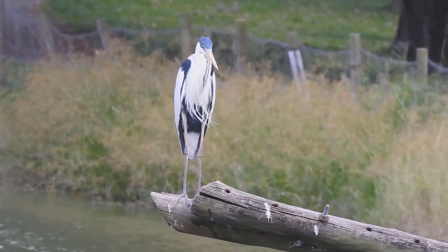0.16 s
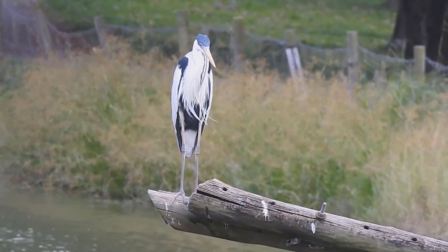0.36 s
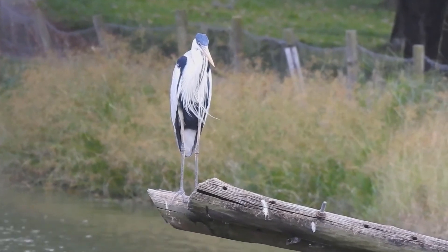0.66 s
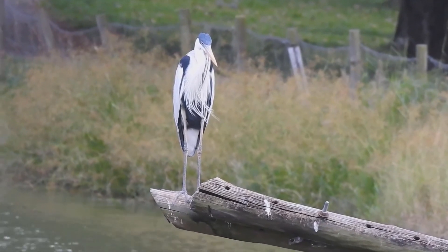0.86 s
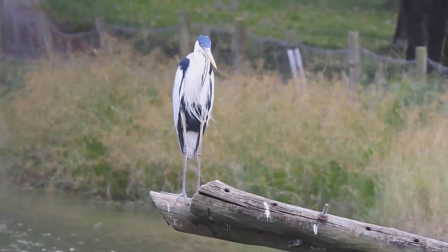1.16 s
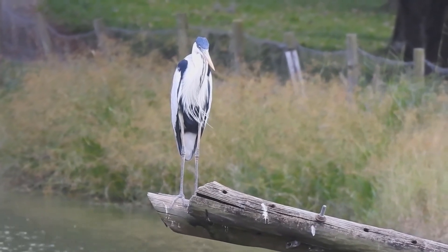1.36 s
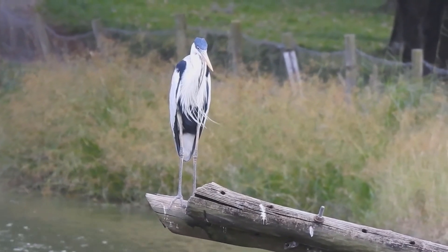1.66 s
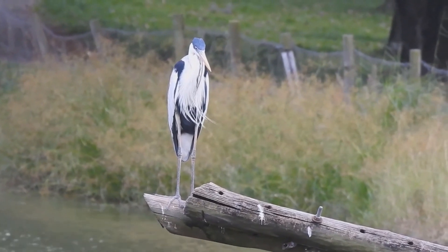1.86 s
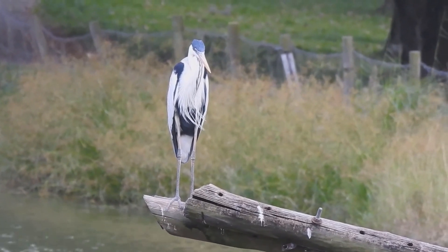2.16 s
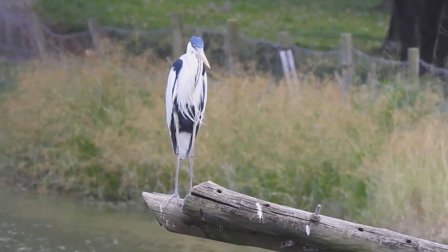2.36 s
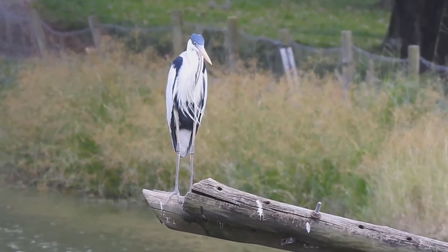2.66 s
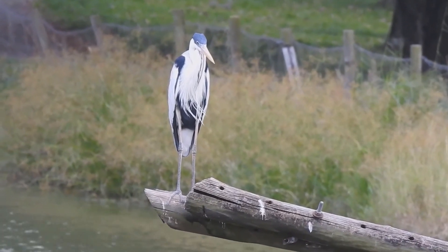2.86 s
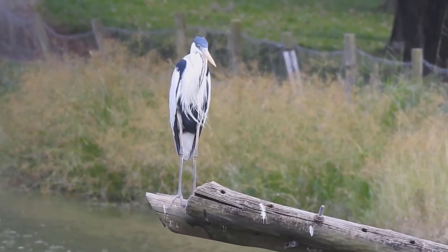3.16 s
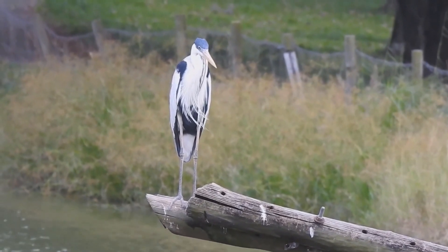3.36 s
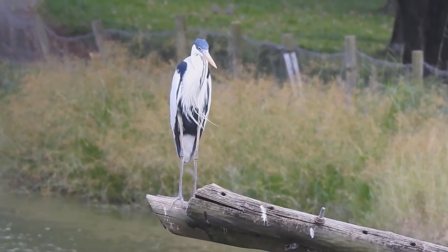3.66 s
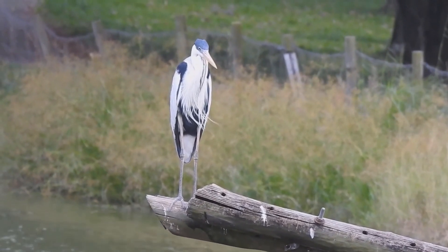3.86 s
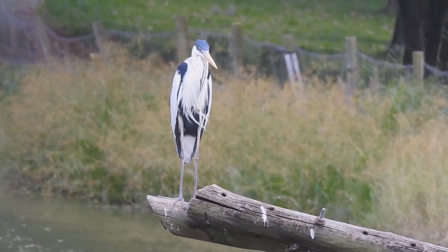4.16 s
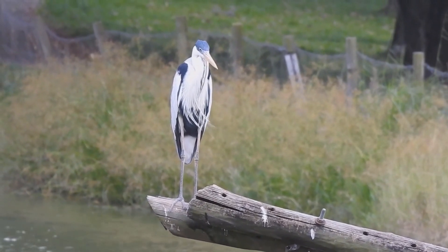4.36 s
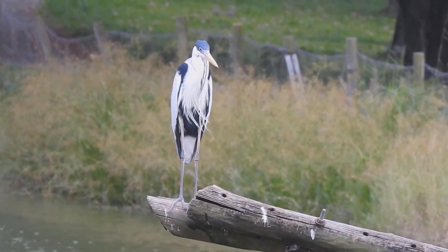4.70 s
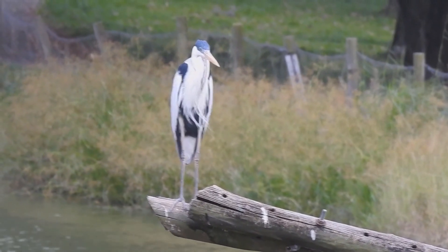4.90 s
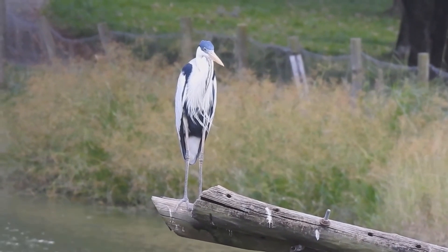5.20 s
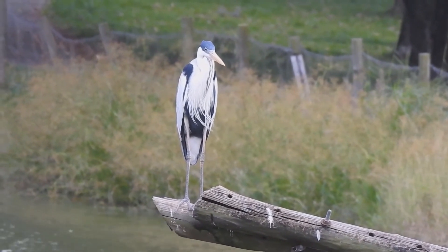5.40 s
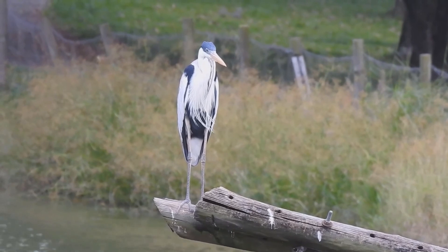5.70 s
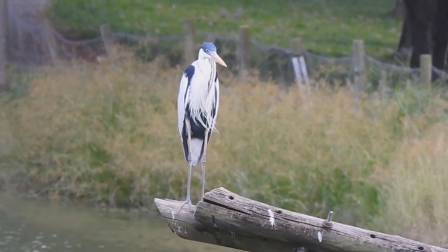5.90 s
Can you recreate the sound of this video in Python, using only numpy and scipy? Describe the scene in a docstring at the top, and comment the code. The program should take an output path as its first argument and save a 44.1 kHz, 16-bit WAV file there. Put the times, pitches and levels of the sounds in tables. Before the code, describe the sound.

A dense, steady high insect drone over a breezy pond, with quick bird whistles and chirps, low wind buffeting the microphone and a faint distant rumble.

```python
"""A pond on a breezy day: a dense chorus of insects drones in one high band, shaped from noise by one broad resonance.
Small birds whistle and squeak in the trees as bending sine notes, with a scattered tail of decaying noise.
Wind buffets each microphone port on its own: resonant low noise that swells with the gusts.
A far-off roar of noise in bands that flicker quickly and slowly, and a faint motor hum of four sine lines, lie under it."""
import sys
import numpy as np
from scipy import signal
from scipy.fft import rfft, irfft, next_fast_len
from scipy.io import wavfile
from scipy.ndimage import uniform_filter1d

SR = 44100
rng = np.random.default_rng(int(sys.argv[2]) if len(sys.argv) > 2 else 0)


def materialize(psi):
    """Save the field psi as 16-bit PCM at rate SR to the path in sys.argv[1].

    A 1-D psi becomes a single channel; in a 2-D psi each row is a channel.
    """
    bounded = np.clip(np.atleast_2d(psi).T, -1, 1)
    quanta = np.round(bounded * 32767).astype(np.int16)
    wavfile.write(sys.argv[1], SR, quanta)


N = 266342  # length in samples
TIME = np.arange(N) / SR
SIDES = np.array([[1], [-1]])  # signs for left and right
PORT_LAG = 2  # samples by which the left port lags

# insects: levels before wavering and panning; throb rate of the nearer singer
CHORUS_DB, SINGER_DB, SINGER_HZ = -38, -43.5, 68.8
# birds: left against right; energy of the trees' tail, and decay time of the tail
BIRD_PAN_DB, TREES_DB, TREES_T60_S = -2.5, -5, .4
SMEAR_HZ = 380  # rate of the random flutter that blurs the pitch of the echo
RASP_DB, RASP_HZ = -10, 800  # air noise around each near note: level under the tone, spread
PEEP_S, PEEP_SCOOP = 0.032, 0.015  # length; how far below pitch it starts, as a share
ARCH_START, ARCH_END = 0.9, 0.92  # shares of the arch's middle pitch
FAR_LOW_HZ, FAR_HIGH_HZ = 2150, 5600  # range of the faint chirps before they bend
FAR_DB = -66.5  # the faintest chirp
# wind: centre and width of each single resonance; slopes of a gust
THUD_HZ, THUD_WIDTH_HZ = 79, 90
FLUTTER_HZ, FLUTTER_WIDTH_HZ = 142, 112
RISE_DB_PER_S, FALL_DB_PER_S = 151, 132
ROAR_DB = -30
TOP_HZ = 15300  # upper limit of the microphone


def undb(db):
    """Decibels to an amplitude factor."""
    return 10 ** (np.asarray(db) / 20)


def level(x, db):
    """Scale a sound to a given RMS level."""
    return x * undb(db) / np.sqrt(np.mean(x ** 2))


def walk(rate):
    """Random levels held 1 / rate s and slewed twice; spread near 1."""
    hold = int(SR / rate)
    steps = np.repeat(rng.standard_normal(N // hold + 1), hold)
    slewed = uniform_filter1d(uniform_filter1d(steps, hold), hold)
    return 1.117 * slewed[:N]


def blend(mid, side, alike):
    """Mix a shared and an opposed part into left and right of a given likeness (-1 to 1)."""
    return np.sqrt(1 + alike) * mid + np.sqrt(1 - alike) * side * SIDES


def pair(alike):
    """Left and right noise of a given likeness."""
    mid, side = rng.standard_normal((2, N))
    return blend(mid, side, alike)


def along(table, hz):
    """Read a curve drawn over log frequency."""
    points_hz, values = np.transpose(table)
    return np.interp(np.log(hz), np.log(points_hz), values)


def bins_hz(size):
    """Frequencies of a spectrum, kept above zero for the logarithm."""
    return np.maximum(np.arange(size // 2 + 1) * SR / size, 1)


def insects():
    """Countless clicks all round blur into a drone; one nearer singer on the right throbs at its muscle rate."""
    left, right = pair(.3)
    crowd = level(organ(np.array([np.roll(left, PORT_LAG), right])), CHORUS_DB)
    shared_db = .5 * walk(1.56)
    own_db = 0.21 * np.array([walk(25.5), walk(24.8)])
    crowd = crowd * undb(shared_db + own_db - 0.51 * SIDES)  # a little stronger on the right
    cycle = np.cumsum(SINGER_HZ * (1 + 0.01 * walk(3.7))) / SR % 1
    bursts = rng.standard_normal(N) * np.exp(-cycle / .5)  # each cycle strikes and decays
    singer = level(organ(bursts), SINGER_DB) * undb(2.0 * walk(1.0))
    return crowd + singer * undb([[-7], [0]])


def organ(x):
    """The broad resonance of the sound organ, falling away on both sides."""
    # resonance of the sound organ: (f/Hz, relative level per Hz/dB)
    resonance = [(5200, -13), (6000, 3.5), (6550, 7), (6850, 1.5), (7300, -10.5), (9000, -29)]
    size = next_fast_len(N)
    hz = bins_hz(size)
    octaves_outside = abs(np.log2(np.clip(hz, resonance[0][0], resonance[-1][0]) / hz))
    gain_db = along(resonance, hz) - 16.5 * octaves_outside
    return irfft(rfft(x, size) * undb(gain_db), size)[..., :N]


def birds():
    """Direct song, a little from the right, and its scatter from trunks and leaves."""
    song = near_birds()
    rasp_filter = signal.butter(2, RASP_HZ, fs=SR, output="sos")
    air = level(signal.sosfilt(rasp_filter, rng.standard_normal(len(song))), RASP_DB)
    song = (song * (1 + air) + far_birds(len(song), count=900))[:N]
    # unsteady throats and moving air roughen each note
    song = song * undb(1.5 * walk(90) + 2.5 * walk(300))
    direct = np.array([np.roll(song, PORT_LAG), song]) * undb(SIDES * BIRD_PAN_DB / 2)
    return direct + trees(song)


def trees(song):
    """Scatter builds up and dies away as noise; fast random flutter blurs the pitch of the echo."""
    t = TIME[:SR // 2]
    decay = np.exp(-np.log(1000) * t / TREES_T60_S)
    tail = rng.standard_normal((2, len(t))) * decay * (1 - np.exp(-t / 0.025))
    tail *= undb(TREES_DB) / np.sqrt(np.sum(tail ** 2, axis=1, keepdims=True))
    blurred = song * level(walk(SMEAR_HZ), 0)
    return signal.fftconvolve(blurred[None], tail)[:, :N]


def near_birds():
    """Whistles with a weak octave, pure warbles and overtone-rich squeaks on one track."""
    # long warbles, each a pitch curve: (t/s, f/Hz)
    warbles = [
        [(.73, 5190), (.79, 6070), (.85, 6430), (.92, 6320)],
        [(2.43, 4200), (2.465, 5200), (2.48, 5500), (2.5, 4750), (2.53, 4440)],
        [(2.665, 5550), (2.685, 5250), (2.71, 4800), (2.735, 4730)],
        [(2.93, 5500), (2.955, 4160), (2.98, 3830), (3.01, 4050), (3.04, 4990), (3.075, 4730), (3.11, 3950)],
        [(3.075, 4850), (3.1, 5360), (3.12, 5050), (3.135, 4260)],
        [(4.12, 4350), (4.15, 4880), (4.175, 4340), (4.2, 3780)],
    ]
    # one value per warble: (level/dB)
    warble_levels = [-40, -47, -51, -48, -45, -50]
    # nasal squeaks: (t/s, length/s, start f/Hz, middle f/Hz, end f/Hz, level/dB, second partial trim/dB)
    squeaks = [(1.344, 0.071, 1410, 1505, 1435, -49, -20), (1.57, .15, 1383, 1522, 1705, -50, -7.5)]
    # squeak overtones from the fundamental up, before the trim: (level/dB)
    squeak_partials = [-7, 14, 4, 7.5, -7]
    song = np.zeros(N + SR)
    for s, length, hz, db in whistles():
        add(song, s, length, hz, db, [0, -24], edge=.25)
    for curve, db in zip(warbles, warble_levels):
        s, hz = np.transpose(curve)
        length = s[-1] - s[0]
        add(song, s[0], length, hz, db, [0], edge=.1, at=(s - s[0]) / length)
    for s, length, *hz, db, second_db in squeaks:
        partials_db = np.add(squeak_partials, [0, second_db, 0, 0, 0])
        add(song, s, length, hz, db, partials_db, edge=.15)
    return song


def whistles():
    """Whistled notes as (s, length s, pitches Hz, level dB), each kind by its own rule."""
    # steps of a climbing phrase:
    # (t after its start/s, length/s, start f/Hz, middle f/Hz, end f/Hz, level above the phrase/dB)
    climb_steps = [(0, 0.0216, 2890, 3010, 3770, -4), (0.016, 0.0335, 3980, 3960, 4200, 1),
                   (0.027, 0.026, 2260, 2334, 2330, -5), (0.043, 0.015, 4130, 4450, 4840, -2),
                   (0.049, 0.036, 4930, 5000, 5000, 3.5), (0.065, 0.0202, 5530, 5860, 6100, 6),
                   (0.085, 0.044, 6550, 6520, 6500, 0)]
    # each time the phrase is sung: (t/s, steps begun within/s, level/dB)
    climbs = [(1.698, .047, -45), (1.935, .1, -37), (2.08, .058, -38), (2.198, .024, -39.5)]
    # short peeps, level after a small scoop: (t/s, f/Hz, level/dB)
    peeps = [(1.17, 2280, -54), (1.199, 4470, -45), (1.277, 4800, -49), (1.302, 5340, -56),
             (1.555, 3740, -46), (1.742, 4740, -35), (1.775, 4760, -38), (1.857, 5490, -31.5),
             (1.888, 5500, -40), (1.884, 4720, -39.5), (2.02, 4950, -39), (2.025, 5650, -42),
             (2.16, 4970, -41.5), (2.185, 4990, -38), (2.505, 5040, -50), (2.455, 3020, -48),
             (2.485, 3800, -51), (2.513, 3050, -47), (2.575, 3060, -55), (2.583, 5050, -52),
             (2.658, 4940, -51), (2.63, 3030, -66), (2.685, 3000, -55), (2.711, 3000, -60),
             (2.759, 3060, -51), (2.787, 2980, -56), (2.83, 3040, -58), (2.89, 3030, -49.5),
             (2.92, 4990, -50), (2.93, 3020, -55), (3.025, 5050, -52), (3.121, 3160, -49),
             (3.18, 3190, -64), (3.283, 3060, -56), (3.305, 2950, -50), (3.325, 3180, -55),
             (3.419, 3130, -50.5), (3.496, 4630, -45), (3.525, 2400, -55), (3.529, 3140, -53),
             (3.568, 4270, -50), (3.625, 2420, -58), (4.13, 3050, -49), (4.415, 3050, -49),
             (4.82, 3050, -50.5), (3.564, 5900, -40.5), (3.566, 5500, -42), (5.03, 2320, -50.5),
             (5.585, 5300, -46), (5.62, 5230, -53)]
    # arched chirps: (t/s, length/s, middle f/Hz, level/dB)
    arches = [(3.158, 0.034, 5280, -45), (3.365, 0.031, 5140, -47), (5.398, 0.058, 8030, -52)]
    # straight slides: (t/s, length/s, start f/Hz, end f/Hz, level/dB)
    slides = [(1.824, 0.015, 3800, 3600, -46), (1.7, 0.032, 4650, 4930, -36), (2.1, 0.019, 8700, 7600, -54),
              (2.272, .02, 9000, 8500, -57), (1.3, 0.044, 4000, 4520, -55.5), (2.39, 0.02, 4200, 4050, -46),
              (2.74, .042, 5300, 5100, -44), (2.825, 0.041, 4880, 4200, -46),
              (2.41, 0.037, 4100, 5200, -50), (2.5, .04, 4800, 4500, -53), (3.228, 0.017, 4700, 5350, -42),
              (3.99, 0.07, 4600, 3800, -54)]
    notes = []
    for s, sung, db in climbs:
        for after, length, *hz, step_db in climb_steps:
            if after < sung:
                notes.append((s + after, length, hz, db + step_db))
    for s, hz, db in peeps:
        notes.append((s, PEEP_S, [hz * (1 - PEEP_SCOOP), hz, hz], db))
    for s, length, middle, db in arches:
        notes.append((s, length, [middle * ARCH_START, middle, middle * ARCH_END], db))
    for s, length, *hz, db in slides:
        notes.append((s, length, hz, db))
    return notes


def far_birds(length, count):
    """Faint chirps scattered at random in time; the lower the pitch, the less it bends."""
    out = np.zeros(length)
    for when, long, high, bend, end, loud in rng.random((count, 6)):
        hz = FAR_LOW_HZ * (FAR_HIGH_HZ / FAR_LOW_HZ) ** high
        path = hz * (1 + 0.164 * high * np.array([0, bend - .5, 2 * end - 1]))
        add(out, when * N / SR, 0.0243 + 0.0287 * long, path, FAR_DB + 8 * loud, [0], edge=.4)
    return out


def add(out, s, length, hz, db, partials_db, edge, at=None):
    """One note: it bends smoothly through its pitches (at even steps, or at given shares) and swells and fades."""
    u = np.linspace(0, 1, int(length * SR))
    if at is None:
        curve = np.polyfit(np.linspace(0, 1, len(hz)), hz, len(hz) - 1)
        pitch = np.polyval(curve, u)
    else:
        pitch = uniform_filter1d(np.interp(u, at, hz), len(u) // 10, mode="nearest")
    phase = 2 * np.pi * np.cumsum(pitch) / SR
    tone = sum(undb(g) * np.sin((k + 1) * phase) for k, g in enumerate(partials_db))
    swell = np.sin(np.pi / 2 * np.clip(np.minimum(u, 1 - u) / edge, 0, 1)) ** 2
    out[int(s * SR):][:len(u)] += np.sqrt(2) * undb(db) * swell * tone


def wind():
    """Eddies beat each port separately; a stronger gust adds more of the higher flutter."""
    gust_db = gusts()
    eddies = undb(2.0 * np.array([walk(18), walk(18)]))
    thud = buffet(pair(0.041) * eddies, THUD_HZ, THUD_WIDTH_HZ)
    flicker = undb(5.5 * np.array([walk(22), walk(20)]))
    flutter = buffet(pair(0.055) * eddies * flicker, FLUTTER_HZ, FLUTTER_WIDTH_HZ)
    flutter_db = -8.5 + .5 * (gust_db + 24.0) - 1.04 * SIDES
    return undb(gust_db) * (thud + flutter * undb(flutter_db))


def buffet(x, hz, width):
    """A steep resonance: the same band-pass four times, brought to 0 dB."""
    band = np.hstack(signal.iirpeak(hz, hz / width, SR))
    return level(signal.sosfilt(np.vstack([band] * 4), x), 0)


def gusts():
    """Level in dB on each port: the breeze, and gusts that rise fast and die away more slowly."""
    # slowly changing breeze, alike on both ports: (t/s, level/dB)
    breeze = [(0, -33), (.9, -37), (1.9, -42), (2.5, -45), (2.75, -30.5), (3.9, -28.5), (4.4, -41.5),
              (5.4, -33.5), (6.04, -34.5)]
    # gusts, each added to the breeze by power: (t of the peak/s, left level/dB, right level/dB)
    gust_peaks = [(.1, -41, -26.5), (.239, -18, -26), (.33, -35, -28), (1.29, -33, -17), (1.49, -31, -47),
                  (1.8, -37, -27), (2.1, -30, -23.5), (2.66, -29, -25), (3.38, -21, -26), (3.599, -36, -16),
                  (3.72, -24.5, -18), (3.87, -21.5, -26), (4.64, -46, -21), (4.88, -19, -19.5),
                  (4.95, -40, -15.5), (5.1, -35, -19), (5.24, -34, -18)]
    power = undb(np.interp(TIME, *np.transpose(breeze))) ** 2
    for s, *db in gust_peaks:
        slope_db = np.where(TIME < s, RISE_DB_PER_S, FALL_DB_PER_S) * abs(TIME - s)
        power = power + undb(np.array(db)[:, None] - slope_db) ** 2
    return 10 * np.log10(power)


def roar():
    """Quarter-octave slices of a smooth noise, each flickering quickly and slowly by itself."""
    # far roar of the countryside: (f/Hz, relative level per Hz/dB)
    roar_curve = [(40, -14), (52, 7.4), (72, 5.8), (100, -1), (190, -4), (260, -14), (500, -16), (750, -25),
                  (1000, -25), (1500, -30.5), (2000, -35.5), (3000, -33), (3700, -36.5), (4800, -30),
                  (7500, -43), (9500, -51), (13000, -56), (15000, -70)]
    # likeness of left and right: (f/Hz, likeness from -1 to 1)
    likeness = [(100, 0.98), (800, 0.93), (2500, 0.82), (4500, 0.94), (7000, 0.66), (10000, -0.26)]
    size = next_fast_len(N)
    hz = bins_hz(size)
    mid, side = rfft(rng.standard_normal((2, size))) * undb(along(roar_curve, hz))
    both = blend(mid, side, along(likeness, hz))
    out = 0
    for centre in 32 * 2. ** np.arange(0, 9.25, .25):
        # neighbouring slices overlap and sum to one
        part = np.cos(np.pi / 2 * np.clip(4 * np.log2(hz / centre), -1, 1)) ** 2
        flicker_db = 1.72 * walk(2.7) + 1.93 * walk(9) + 2.38 * walk(24.005)
        out = out + irfft(both * part, size)[:, :N] * undb(flicker_db)
    return level(out, ROAR_DB)


def hum():
    """A distant motor: the lowest line is steady, each higher one wavers more in level and pitch."""
    # lines of the motor, before wavering: (f/Hz, level/dB)
    lines = [(26.68, -43), (53.4, -50.5), (106.7, -44), (345, -53.5)]
    out = 0
    for k, (hz, db) in enumerate(lines):
        amplitude = np.sqrt(2) * undb(db + 0.67 * np.sqrt(k) * walk(7.8))
        phase = 2 * np.pi * hz * np.cumsum(1 + 0.00591 * k * walk(12)) / SR
        out = out + amplitude * np.sin(phase)
    return out


def scene():
    """All layers sound together in stereo; the hum is the same on both sides."""
    return insects() + birds() + wind() + roar() + hum()


def record(dry):
    """The microphone cuts the very top with a steep low-pass."""
    return signal.sosfilt(signal.ellip(8, .2, 70, TOP_HZ, fs=SR, output="sos"), dry)


dry = scene()
out = record(dry)
materialize(out)
```